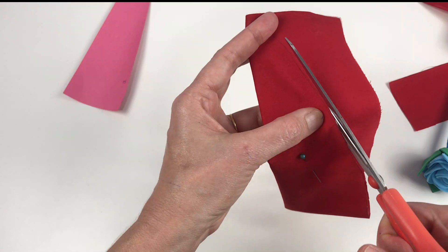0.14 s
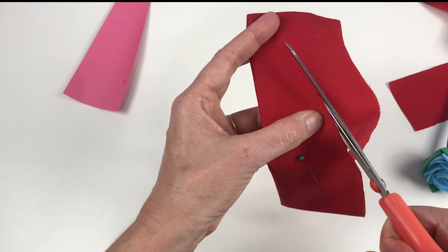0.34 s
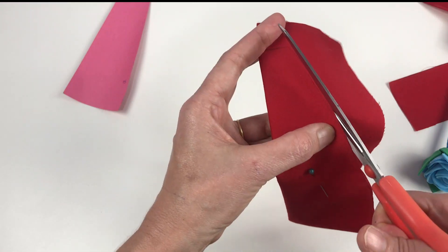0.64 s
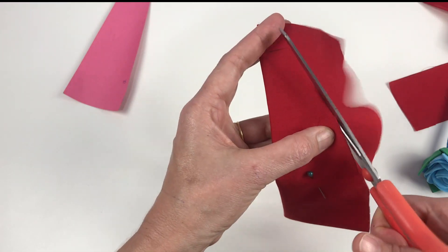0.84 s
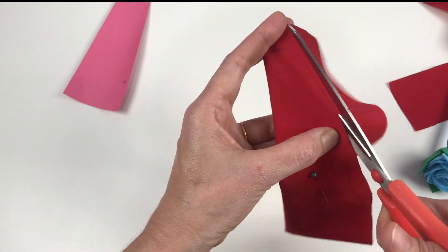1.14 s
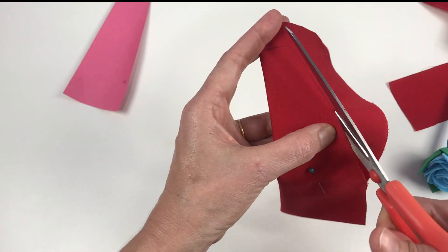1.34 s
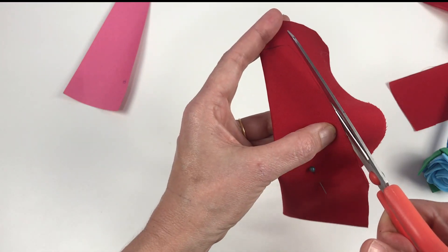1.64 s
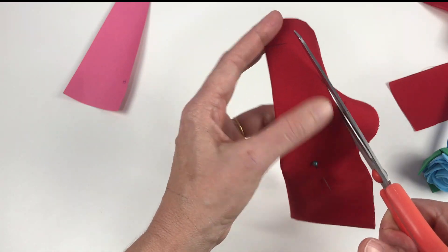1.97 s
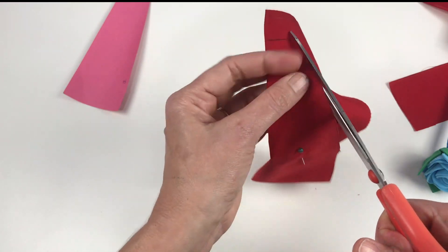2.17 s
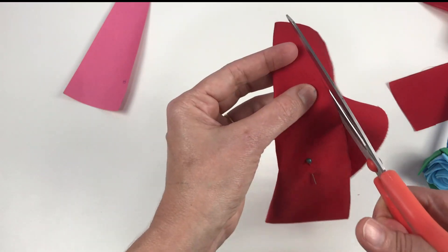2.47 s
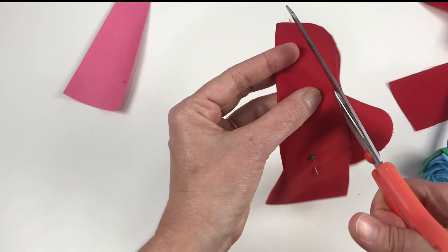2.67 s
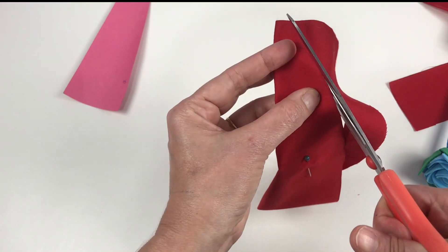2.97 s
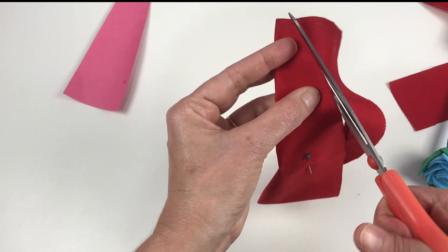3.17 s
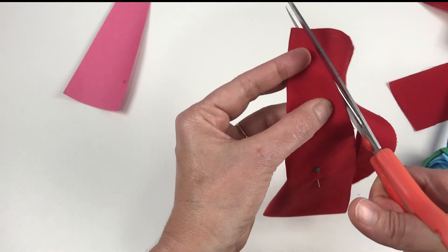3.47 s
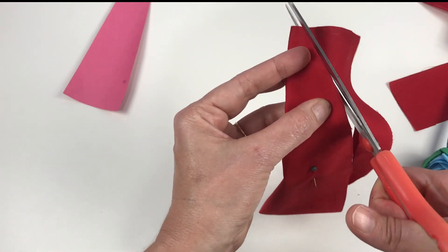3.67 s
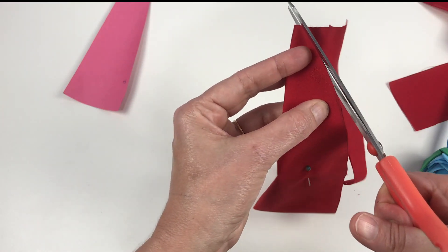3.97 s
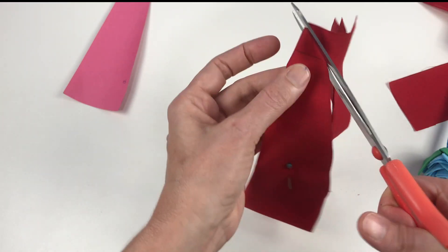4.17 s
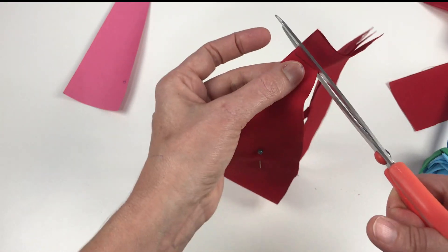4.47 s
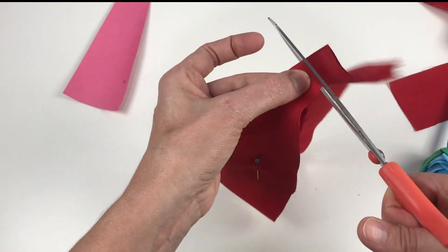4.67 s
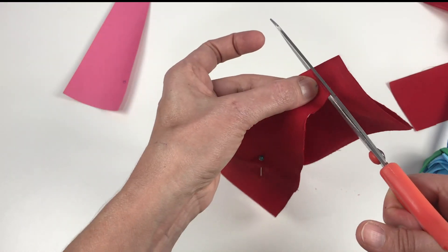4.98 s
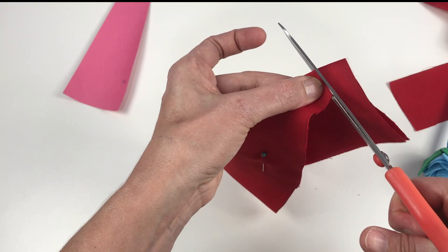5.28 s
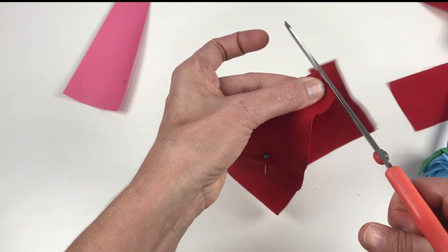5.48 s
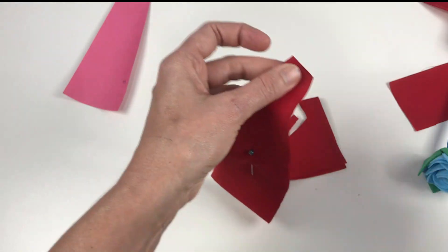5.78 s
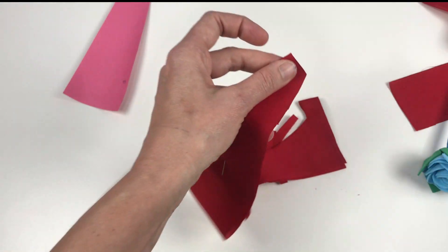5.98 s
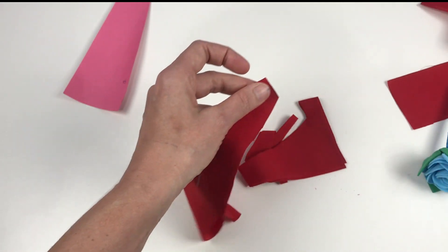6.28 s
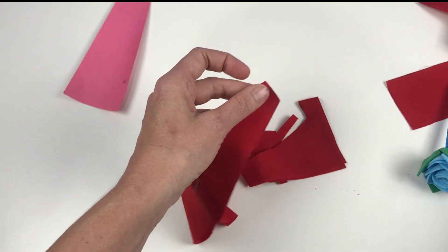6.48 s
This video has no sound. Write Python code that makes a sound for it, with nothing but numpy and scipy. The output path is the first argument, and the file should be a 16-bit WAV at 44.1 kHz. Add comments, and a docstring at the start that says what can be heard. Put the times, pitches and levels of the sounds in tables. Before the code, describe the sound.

Very close in a small quiet room, steel scissors cut folded cotton five times, slowly. Each stroke is a rough, crackling crunch of parting threads that brightens towards the tips. Between strokes the blades reopen with faint scrapes and small ticks. The fifth cut ends in a loud, bright clack. Then the cloth drops, swishes and flops, with a soft table bump and light finger taps.

```python
"""Scissors through cotton

Steel scissors make five slow cuts through folded cotton, close above a table in a small quiet room.
Thread bundles burst as noise through the blade resonances; the blades rub, tick and finally clack shut.
The cloth slides, swishes and flops as swelling coloured noise; the hands rub, tap and bump on the table.
A short echo of the scissors and a faint bed of air noise lie behind."""
import sys
import numpy as np
from scipy import signal
from scipy.fft import rfft, irfft, next_fast_len
from scipy.io import wavfile
from scipy.ndimage import map_coordinates

SR = 44100
rng = np.random.default_rng(int(sys.argv[2]) if len(sys.argv) > 2 else 0)


def waveform_to_disk(signal):
    """Save audio, clipped to [-1, 1], as 16-bit WAV at the path in sys.argv[1]."""
    frames = np.transpose(np.atleast_2d(signal))
    scaled = np.clip(frames, -1, 1) * 32767
    samples = np.round(scaled).astype(np.int16)
    wavfile.write(sys.argv[1], SR, samples)


N = 291942
TIME = np.arange(N) / SR
SIZE = 2 * next_fast_len(N // 2 + SR // 2)  # padded FFT length
HZ = np.fft.rfftfreq(SIZE, 1 / SR)

# Thick thread bundles parting. Each row: time in seconds, level in dB, length in ms.
SNAPS = [(.1, -33.5, 2), (.122, -35, 4.6), (.142, -35.5, 2.2), (0.162, -33.5, 3.5), (0.1832, -35, 5.2),
         (.1993, -31.5, 7.1), (0.2267, -33, 8.6), (0.2554, -28.5, 3.8), (0.259, -34.5, 5.5),
         (0.2647, -33, 3.6), (0.288, -35.5, 10.7), (.315, -30, 1.8), (.334, -33.5, 5), (0.3577, -34.5, 2.4),
         (1.6, -40.5, 6), (1.6588, -33, 2.4), (1.6786, -36, 4), (1.6905, -35, 3.5), (1.7064, -34, 1.9),
         (1.7298, -31.5, 2), (1.7449, -27, 1.7), (1.7647, -32, 5), (1.7983, -30.5, 1.5),
         (1.8334, -30.5, 5.7), (1.9153, -27.5, 1.5), (2.8418, -44.5, 2.5), (2.8816, -36.5, 3.9),
         (2.907, -32.5, 4.4), (2.922, -31.5, 1.7), (2.9343, -30, 2.2), (2.973, -35.5, 3.7),
         (2.9883, -32, 5.6), (3.004, -28.5, 4.4), (3.0299, -33, 3.7), (3.0526, -34, 2.6),
         (3.0721, -34, 2.4), (3.0904, -33.5, 6.4), (3.101, -37.5, 4.8), (3.1345, -33, 4),
         (3.1478, -30.5, 1.6), (3.704, -39, 2), (3.719, -41.5, 6.7), (3.7322, -37, 4.3), (3.7434, -32.5, 2),
         (3.776, -38.5, 19.3), (3.838, -35.5, 6), (3.8742, -34.5, 1.9), (3.8833, -32, 2.6),
         (3.9159, -32, 6.6), (3.9446, -38, 2.7), (3.9782, -31.5, 6.7), (4.0275, -30, 3), (5.1725, -44, 5.5),
         (5.196, -40, 15), (5.217, -35.5, 2.5), (5.2272, -37.5, 3), (5.2373, -35.5, 4.6),
         (5.2816, -30, 2.4), (5.3056, -32, 4.1), (5.3176, -29.5, 3.9), (5.3418, -35.5, 6.2),
         (5.3653, -29, 2.3), (5.39, -30, 2), (5.412, -31, 3.8), (5.452, -31.5, 6.5), (5.5091, -32, 4.4)]
EDGE_GROWS_DB, TIP_POWER = 8.5, 1.43  # a snap sharpens along the stroke, mostly late
BODY_GROWS_DB = 14  # its low ring rises too
COLOUR_SPREAD_DB = 1.73  # no two bundles sound alike


def cutting(body_db=0, middle_db=0, edge_db=0, thud_db=-15):
    """Thread bundles burst one after another; along each stroke the blades ring fuller and sharper."""
    tracks = np.zeros((2, 3, N))  # pivot and tips, each with body, middle and edge
    t = np.arange(-SR // 100, SR // 30) / SR
    growth_db = np.array([BODY_GROWS_DB, 0, EDGE_GROWS_DB])
    for s, db, length_ms in list(SNAPS) + thin_snaps():
        burst = amp(db) * bundle(t, length_ms / 1000)
        run = travel(s)
        fullness_db, sharpness_db = stroke(s)[-2:]
        colour_db = np.array([fullness_db, 0, sharpness_db]) + growth_db * run ** TIP_POWER
        shares = amp(colour_db + COLOUR_SPREAD_DB * rng.standard_normal(3))
        shares = shares / np.linalg.norm(shares)
        for place, weight in enumerate([1 - run, run]):
            for track, share in zip(tracks[place], shares):
                add(track, s + t[0], weight * share * burst)
    body = above(990) * below(3080, order=12)
    middle = above(3606, order=14) * below(6820, order=12)
    edge = above(7150)
    steel = np.zeros(N)
    for place in (0, 1):
        for track, band, db in zip(tracks[place], [body, middle, edge], [body_db, middle_db, edge_db]):
            steel += amp(db) * filtered(track, causal(blades(place) * band))
    # the taut cloth recoils with a dull thud
    thud = filtered(tracks[:, 1].sum(0), causal(above(89, order=2) * below(800, order=3)))
    return steel + amp(thud_db) * thud


THIN_PER_S, THIN_MS, THIN_SPREAD_DB = 75, 3.25, 2
THIN_FADE_DB = 7.5  # weaker towards the end of the stroke
THIN_RISE_S = 0.032  # growth to full strength as the blades bite in
CLEAR_S = .009  # no thin bundle parts this close to a thick one


def thin_snaps(count=40):
    """Thin bundles part at an uneven pace in the gaps between the thick ones: rows (s, dB, ms)."""
    thick_s, rows = np.array(SNAPS)[:, 0], []
    for start, _, end, _, _, db, *_ in CUTS:
        for k, (late, size) in enumerate(zip(rng.random(count), rng.standard_normal(count))):
            s = start + (k + late) / THIN_PER_S
            if s < end and np.abs(thick_s - s).min() > CLEAR_S:
                rise_db = BITE_DB * np.exp((start - s) / THIN_RISE_S)
                fade_db = THIN_FADE_DB * travel(s) ** 2
                rows.append((s, db + rise_db - fade_db + THIN_SPREAD_DB * size, THIN_MS))
    return rows


def bundle(t, width, lead=0.69, tail_share=0.47, tail_s=0.0072, spread_db=3, bounce=0.34):
    """A bundle gives way abruptly as a few ms of fibre cracks, then the stragglers follow."""
    start = 1 / (1 + np.exp(np.clip(-(t + lead * width) / .0004, -50, 50)))
    main = np.exp(-(2 * t / width) ** 2 / 2)
    stragglers = tail_share * np.exp(-np.abs(t) / tail_s)
    swell = start * np.maximum(main, stragglers)
    fibres = grains(spread_db, len(t))
    # a quick echo at a random delay varies each snap's colour
    sign, delay_s = rng.choice([-1, 1]), rng.uniform(.0003, .0011)
    fibres = fibres + bounce * sign * np.roll(fibres, round(SR * delay_s))
    return unit(swell * fibres) * np.sqrt(np.mean(swell ** 2))


# Resonances of the gripping blades.
# Each row: frequency in Hz, width in Hz, level in dB cutting at the pivot, level in dB at the tips.
BLADES = [(1125, 120, -3, 2), (1500, 400, 6, -20), (1920, 400, 7.5, 4), (2400, 260, -25, 0.5),
          (3330, 144, 4, -8), (4400, 96, 7.5, 3), (4570, 610, 6, 0), (5540, 850, 7, -15),
          (5300, 380, -7, -4), (6480, 480, 8, -3), (6490, 840, 6, 3), (7700, 450, -23, 4),
          (8470, 490, -37, 11), (9580, 130, 3.5, -7), (9800, 280, -8, 5), (11900, 170, -29, -7),
          (11520, 300, -24, 12.5), (12350, 79, 1, 10), (13000, 300, -4, -30), (13900, 650, -6, -21),
          (14300, 600, 3, -12), (14850, 200, -3, 8)]


def blades(place, direct_db=-10):
    """Gain of the blades when struck at the pivot (place 0) or the tips (place 1)."""
    return resonances([(hz, width, dbs[place]) for hz, width, *dbs in BLADES], direct_db)


# Closing strokes. Each row: first bite in seconds, hardest squeeze in seconds,
# end of stroke in seconds (the rub starts to fall away fast), blade rub in dB, cloth drag in dB,
# thin bundles in dB, fullness in dB, sharpness in dB.
# Fullness and sharpness: low ring and top of a snap at the first bite, against its middle.
CUTS = [(0.077, .22, 0.4, -48, -58, -42, -11, -3), (1.591, 1.73, 1.97, -56.5, -60.5, -41.5, -10.5, -2.5),
        (2.845, 2.931, 3.16, -55, -68, -40.5, -11.5, -3), (3.689, 3.759, 4.03, -55, -65, -37, -13, -4.5),
        (5.169, 5.345, 5.79, -68, -55, -56, -6.5, 1.5)]
BITE_DB, END_DB = -6, -14  # effort at the first bite and the end of stroke, against the hardest squeeze
ATTACK_DB_PER_S, RELEASE_DB_PER_S = 440, 260  # effort building before a stroke, letting go after it


def effort(start, squeeze, end):
    """Gain of one closing stroke: it bites, swells to the hardest squeeze, eases to its end and lets go."""
    held_db = np.interp(TIME, [start, squeeze, end], [BITE_DB, 0, END_DB])
    before_db = ATTACK_DB_PER_S * np.maximum(start - TIME, 0)
    after_db = RELEASE_DB_PER_S * np.maximum(TIME - end, 0)
    return amp(held_db - before_db - after_db)


def stroke(s):
    """The closing stroke whose hardest squeeze is nearest to time s."""
    return min(CUTS, key=lambda cut: abs(cut[1] - s))


def travel(s):
    """Share of the stroke done at time s: 0 at the first bite, 1 at its end; it blends pivot into tip colour."""
    start, _, end = stroke(s)[:3]
    return np.clip((s - start) / (end - start), 0, 1)


# The blades open and slide into place. Each row: centre in seconds, half length in seconds, level in dB.
SLIDES = [(.535, 0.032, -55), (.65, 0.063, -55.5), (.98, 0.051, -57), (1.195, 0.024, -53.5),
          (2.05, 0.45, -62), (2.38, 0.028, -62), (3.31, 0.017, -59.5), (3.42, 0.13, -60),
          (4.17, 0.043, -58), (4.3, 0.039, -58), (4.43, 0.025, -60), (4.67, 0.068, -56)]
# Rubbing spectrum. Each row: frequency in Hz, relative level in dB per Hz.
SCRAPE = [(1470, -35), (2500, -13.5), (3890, -12), (4210, -11.5), (4990, -12), (5350, -12), (5650, -12),
          (6250, -15), (6600, -13.5), (7830, -17.5), (9080, -12), (10500, -20), (13200, -13), (15200, -24),
          (16000, -7)]


def scraping(closing_db=0, slide_db=0, catch_db=4):
    """The blades rub over each other and over single threads in small catches."""
    closing = sum(amp(db) * effort(start, squeeze, end) for start, squeeze, end, db, *_ in CUTS)
    steel = causal(np.sqrt(blades(0) * blades(1)) * amp(along(SCRAPE)))
    grind = unit(filtered(amp(catch_db * wobble(220)) * grains(6.1, N), steel))
    glide = unit(amp(1.7 * wobble(120)) * rush(SCRAPE, spread_db=6.0))
    return amp(closing_db) * closing * grind + amp(slide_db) * swells(SLIDES) * glide


# The blades touch each other; the top is strongest when the very tips meet.
# Each row: time in seconds, tick level in dB, ring level in dB, bright top level in dB.
TICKS = [(.002, -45, -66, -70), (.911, -32.5, -72, -48), (1.014, -50.5, -74, -54), (1.204, -34.5, -64, -54),
         (1.551, -46.5, -61, -64), (1.913, -44, -83, -30), (3.693, -68, -72, -60),
         (5.508, -23.5, -53, -21.5)]
# Free ring of the steel. Each row: frequency in Hz, width in Hz, level in dB.
STEEL = [(1760, 94, -3.5), (2580, 160, -12), (3600, 62, -6), (4700, 280, 3), (5750, 100, -8),
         (6400, 520, -3.5), (7800, 620, -12), (8800, 470, -11), (11350, 210, -23), (11900, 360, 0),
         (13600, 340, -5.5), (15200, 800, -9)]


def ticks(click_db=0, ring_db=0, top_hz=9500):
    """Steel meets steel: a click with a bright top, and a short shimmer of closely spaced modes."""
    rings = cracks([(s, db) for s, _, db, _ in TICKS], t60=0.42)
    clicks = cracks([(s, db) for s, db, _, _ in TICKS], t60=0.014)
    tops = cracks([(s, db) for s, _, _, db in TICKS], t60=0.029)
    ring = filtered(rings, causal(resonances(STEEL, direct_db=-37)))
    click = filtered(clicks, causal(resonances(STEEL, direct_db=-14.5) * below(5300, order=1)))
    top = filtered(tops, causal(resonances(STEEL, direct_db=-35) * above(top_hz, order=4)))
    return amp(ring_db) * ring + amp(click_db) * click + top


# Brief soft rubs of steel.
# Each row: centre in seconds, half length in seconds, level in dB, band centre in Hz.
SOFT_RUBS = [(0.006, 0.014, -61, 12700), (0.088, 0.012, -48, 12500), (0.538, .018, -58.5, 6230),
             (0.6, 0.14, -70, 3750), (1.555, 0.0093, -67, 13300), (3.32, 0.012, -59, 6200),
             (4.3, 0.011, -55.5, 6240), (5.21, .02, -54, 9400)]


def soft_rubs(sharpness=14):
    """Steel rubs briefly and softly on steel: swelling noise bands centred on the given Hz."""
    out = np.zeros(N)
    for s, half, db, hz in SOFT_RUBS:
        band = 1 / (1 + (sharpness * (HZ / hz - 1) * 2) ** 2)
        rub = filtered(grains(3.1, N), band)
        out += swells([(s, half, db)]) * unit(rub)
    return out


# Cloth dragged over skin and table. Each row: centre in seconds, half length in seconds, level in dB.
DRAGS = [(.47, 0.14, -67), (2.58, 0.13, -59.5), (3.3, 0.14, -65.5), (6.4, 0.28, -76.5)]
# Cloth brushing against itself. Each row: centre in seconds, half length in seconds, level in dB.
SWISHES = [(2.48, 0.034, -60), (2.59, 0.041, -62), (5.94, 0.13, -64), (6.342, 0.038, -50.5),
           (6.41, 0.01, -62), (6.57, 0.059, -56.5)]
# Loose cloth flapping on the table. Each row: centre in seconds, half length in seconds, level in dB.
FLOPS = [(2.52, 0.053, -54.5), (2.67, 0.079, -57.5), (3.29, 0.0079, -60), (5.73, 0.05, -56.5),
         (6.2, 0.073, -55.5), (6.353, 0.012, -47), (6.43, 0.012, -52.5), (6.58, 0.076, -56)]
# Spectrum of the slide. Each row: frequency in Hz, relative level in dB per Hz.
CLOTH = [(210, -4), (350, -14.5), (706, -7.5), (1010, -5.5), (1280, -8), (2580, -13.5), (3860, -16.5),
         (4840, -20), (6000, -17.5), (7800, -23), (13200, -120)]
# Spectrum of the swish. Each row: frequency in Hz, relative level in dB per Hz.
SWISH = [(200, -19), (400, 14), (700, -12.5), (1500, -2), (2500, 1.5), (4500, 0), (7000, -2), (10500, -2.5),
         (13000, -2.5), (16000, -12)]
# Spectrum of the flop. Each row: frequency in Hz, relative level in dB per Hz.
FLOP = [(150, -42), (260, 0), (340, 0), (450, -7), (650, -9.5), (1100, -13), (2500, -24.5), (5000, -31)]
CREEP_DB = -63  # the held cloth never lies quite still; level before slide_db


def cloth(slide_db=-2, swish_db=0, flop_db=0):
    """The weave slides dully on the table, swishes brightly on itself and flops as it falls."""
    pulled = sum(amp(db) * effort(start, squeeze, end) for start, squeeze, end, _, db, *_ in CUTS)
    drag = amp(CREEP_DB) + swells(DRAGS) + pulled
    slide = drag * unit(amp(1.4 * wobble(60)) * rush(CLOTH, spread_db=4.5))
    swish = swells(SWISHES) * unit(amp(1.8 * wobble(100)) * rush(SWISH, spread_db=3.0))
    flop = swells(FLOPS) * unit(amp(2.5 * wobble(50)) * rush(FLOP, spread_db=7.5))
    return amp(slide_db) * slide + amp(swish_db) * swish + amp(flop_db) * flop


# The hands shift their weight on the table.
# Each row: centre in seconds, half length in seconds, rumble in dB, hollow body in dB.
HANDS = [(0.685, 0.036, -63, -88), (2.653, 0.19, -88, -63), (3.446, 0.13, -63.5, -78),
         (3.786, 0.027, -65, -77), (5.402, 0.14, -70, -62.5), (6.144, 0.083, -56, -64.5),
         (6.44, 0.1, -54.5, -59)]
# Spectrum of the rumble. Each row: frequency in Hz, relative level in dB per Hz.
RUMBLE = [(12, -43), (20, -36), (54, -1), (150, -8), (200, -47), (330, -120)]
# Spectrum of the hollow body. Each row: frequency in Hz, relative level in dB per Hz.
HOLLOW = [(65, -43), (110, -6), (156, 2), (205, -1), (324, 3.5), (376, -5), (404, -3.5), (433, -6),
          (520, -8.5), (680, -19), (1140, -120)]
# Soft bumps on the table. Each row: time in seconds, level in dB.
BUMPS = [(5.697, -41), (6.42, -48.5)]
# Modes of the table top. Each row: frequency in Hz, level in dB, t60 in seconds.
TABLE = [(86, -18.5, 0.27), (150.5, -4, 0.38), (243, -11.5, 0.39), (323, -3, 0.13), (444, -21, .15)]
# Light taps of fingers and cloth. Each row: time in seconds, level in dB.
TAPS = [(5.658, -43), (5.802, -64), (5.841, -50.5), (5.936, -52), (6.023, -51), (6.422, -66),
        (6.556, -48.5)]
# Spectrum of a tap. Each row: frequency in Hz, relative level in dB per Hz.
TAP = [(200, -14), (600, -4), (1000, -3), (2200, -7), (4000, -7.5), (8000, -22), (16000, -19)]
REST_RUMBLE_DB, REST_HOLLOW_DB = -64.5, -61.5  # the hands at rest


def table(bump_db=0, tap_db=0):
    """Hands rub as low noise, tap as short bursts and bump the table top into its decaying modes."""
    rumble = amp(REST_RUMBLE_DB) + swells([(s, half, db) for s, half, db, _ in HANDS])
    hollow = amp(REST_HOLLOW_DB) + swells([(s, half, db) for s, half, _, db in HANDS])
    out = rumble * rush(RUMBLE) + hollow * rush(HOLLOW)
    t = np.arange(SR // 2) / SR
    ring = sum(amp(db - 60 * t / t60) * np.sin(2 * np.pi * hz * t) for hz, db, t60 in TABLE)
    soft_onset = 1 - np.exp(-t / 0.0023)
    for s, db in BUMPS:
        add(out, s, amp(db + bump_db) * ring * soft_onset)
    taps = filtered(cracks(TAPS, t60=0.036), causal(amp(along(TAP))))
    return out + amp(tap_db) * taps


# Reverberation. Each row: frequency in Hz, t60 in seconds.
ROOM = [(200, 0.58), (2000, 0.19), (6000, 0.42), (15000, 0.2)]


def room(x):
    """The walls answer after 5 ms; each frequency dies at its own speed."""
    hz, t, z = signal.stft(rng.standard_normal(SR // 2), SR, nperseg=256)
    decay = amp(-60 * t / along(ROOM, hz)[:, None])
    tail = signal.istft(z * decay, SR, nperseg=256)[1]
    tail = np.pad(tail / np.linalg.norm(tail), (SR // 200, 0))
    return signal.fftconvolve(x, tail)[:N]


# Spectrum of the room's air. Each row: frequency in Hz, relative level in dB per Hz.
AIR = [(15, -47), (25, -15), (48, -10.5), (180, -7), (309, -13.5), (575, -13), (641, -13.5), (695, -20),
       (1040, -23.5), (1740, -32), (4140, -25.5), (4740, -31), (16000, -27)]


def air():
    """Steady coloured noise of the quiet room, rms 1."""
    return rush(AIR)


def amp(db):
    """Decibels to gain."""
    return 10 ** (np.asarray(db) / 20)


def unit(x):
    """Scale to rms 1."""
    return x / np.sqrt(np.mean(np.abs(x) ** 2) + 1e-20)


def along(points, hz=HZ):
    """(Hz, value) points joined on a log axis."""
    f, v = np.transpose(points)
    return np.interp(np.log(hz + 1), np.log(f + 1), v)


def wobble(rate):
    """A smooth random curve, rate knots a second."""
    return map_coordinates(rng.standard_normal(int(N * rate / SR) + 4), [TIME * rate])


def swells(rows):
    """The summed gain of Gaussian (s, half length as sigma in s, dB) strokes."""
    return sum(amp(db) * np.exp(-((TIME - s) / half) ** 2 / 2) for s, half, db in rows)


def grains(spread_db, size):
    """Tiny fibre clicks of very unequal strength, rms 1."""
    return unit(rng.standard_normal(size) * amp(spread_db * rng.standard_normal(size)))


def rush(spectrum, spread_db=0):
    """Coloured noise of rms 1, grainier with more spread."""
    return unit(filtered(grains(spread_db, N), amp(along(spectrum))))


def cracks(events, t60):
    """A dying noise burst for each (s, dB)."""
    track, t = np.zeros(N), np.arange(SR // 2) / SR
    for s, db in events:
        add(track, s, amp(db - 60 * t / t60) * rng.standard_normal(len(t)))
    return track


def add(track, s, sound):
    """Mix a sound into a track at time s."""
    part = track[max(round(s * SR), 0):][:len(sound)]
    part += sound[:len(part)]


def filtered(x, response):
    """x through a frequency response."""
    return irfft(rfft(x, SIZE) * response, SIZE)[:N]


def causal(gain):
    """The minimum-phase response of this gain rings only after the blow; it keeps the power of white noise."""
    cepstrum = irfft(np.log(np.maximum(unit(gain), 1e-6)))
    return np.exp(rfft(np.r_[cepstrum[0], 2 * cepstrum[1:SIZE // 2]], SIZE))


def resonances(modes, direct_db):
    """Gain of (Hz, width, dB) modes over a flat direct sound."""
    power = sum(amp(db) ** 2 / (1 + (2 * (HZ - hz) / width) ** 2) for hz, width, db in modes)
    return np.sqrt(power + amp(direct_db) ** 2)


def above(edge_hz, order=8):
    """Gain of a high-pass."""
    return 1 / np.sqrt(1 + (edge_hz / (HZ + 1)) ** (2 * order))


def below(edge_hz, order=8):
    """Gain of a low-pass."""
    return 1 / np.sqrt(1 + (HZ / edge_hz) ** (2 * order))


def scene(room_db=-16, air_db=-65):
    """Scissors and their echo over the handling noise and the room's air."""
    handling = cloth() + table() + amp(air_db) * air()
    scissors = ticks() + scraping() + soft_rubs() + cutting()
    return (scissors + amp(room_db) * room(scissors) + handling)[None]


TOP_HZ = 15850


def record(dry):
    """A very steep low-pass sets the band limit."""
    return filtered(dry[0], below(TOP_HZ, order=100))[None]


dry = scene()
out = record(dry)
waveform_to_disk(out)
```